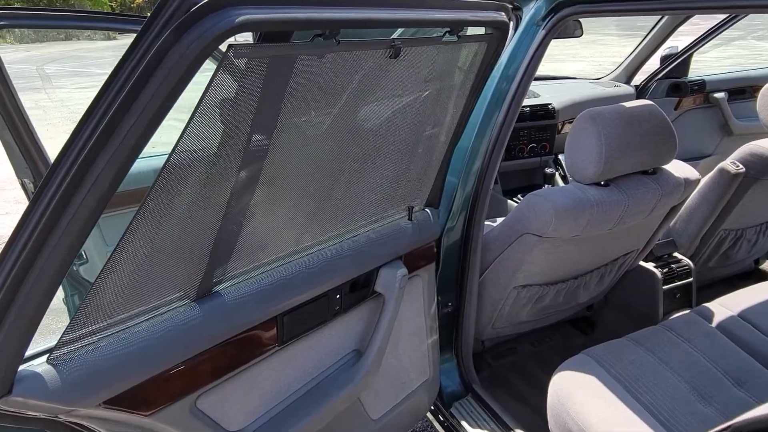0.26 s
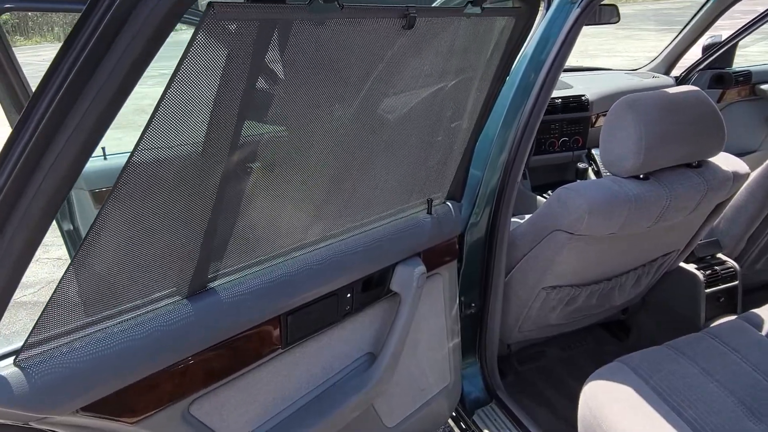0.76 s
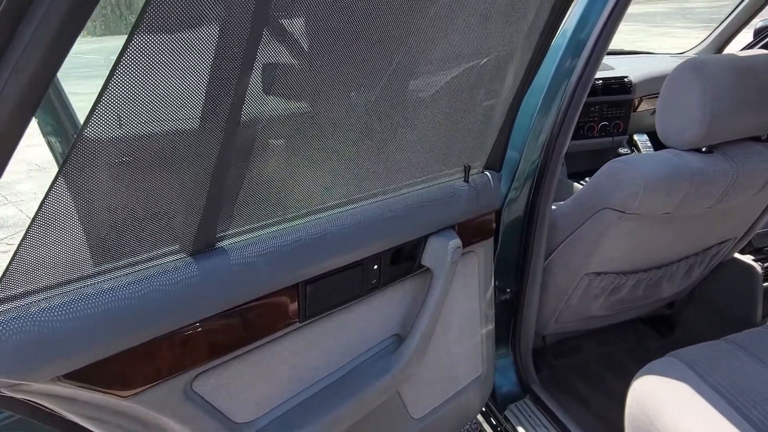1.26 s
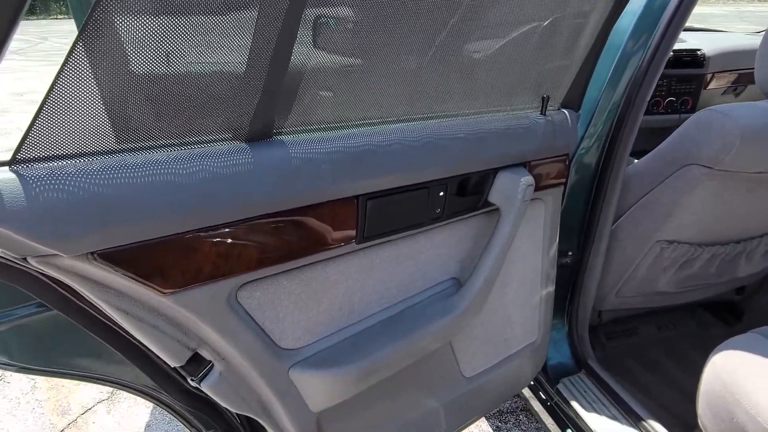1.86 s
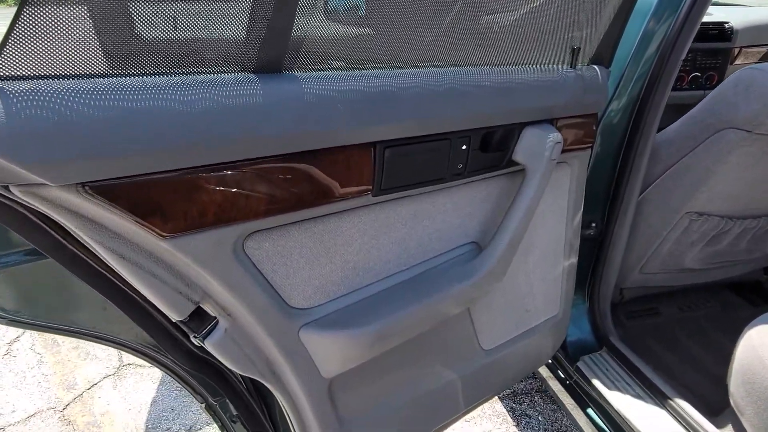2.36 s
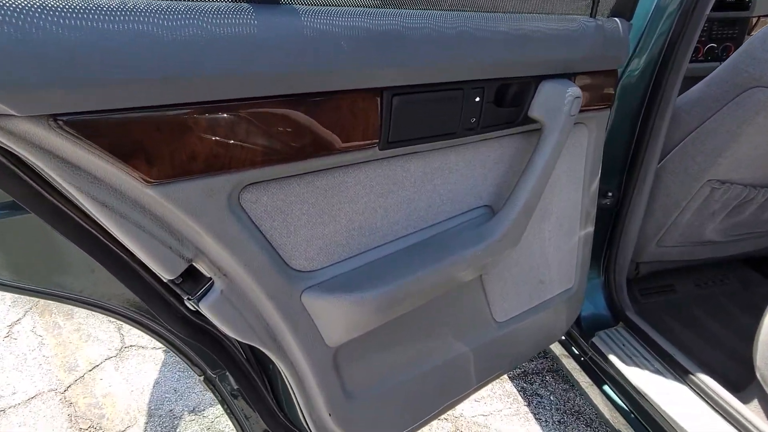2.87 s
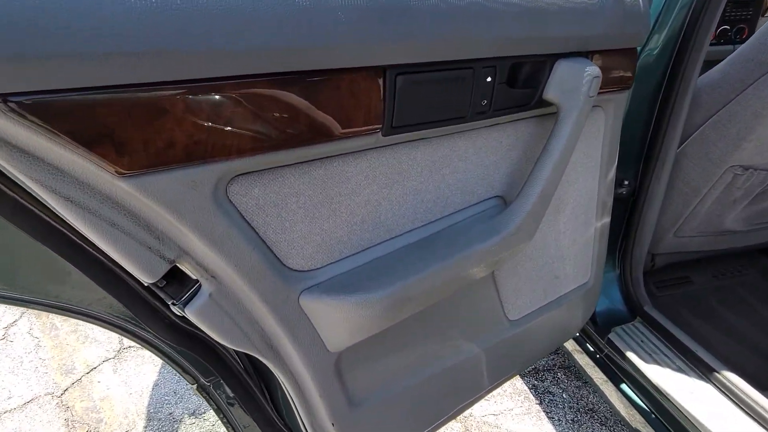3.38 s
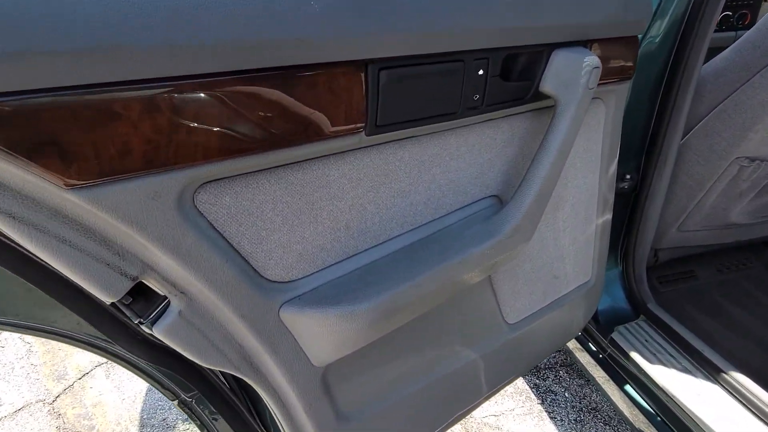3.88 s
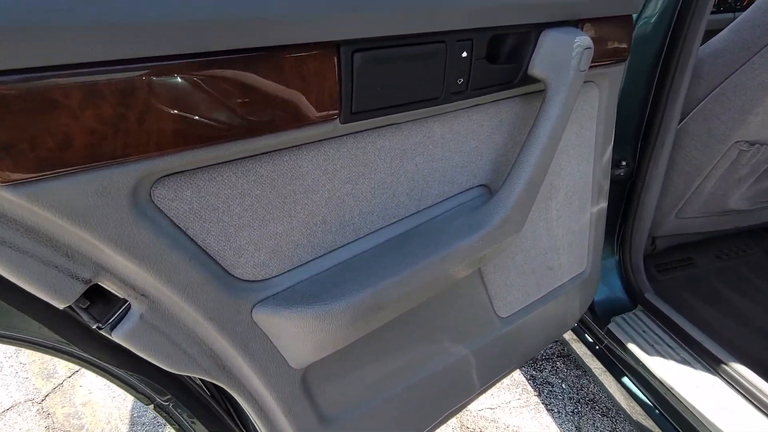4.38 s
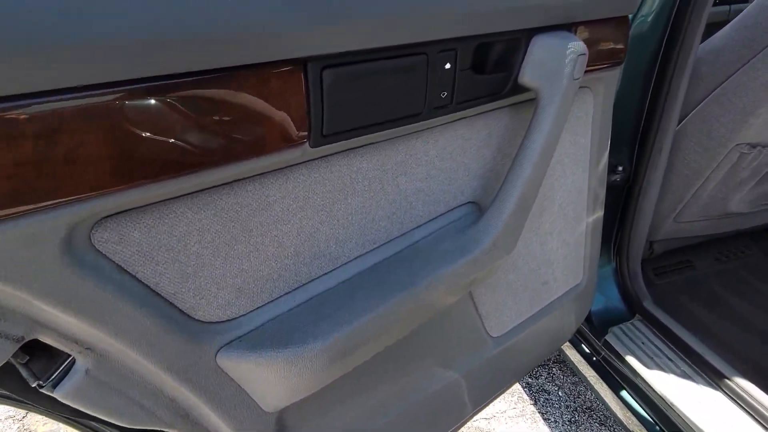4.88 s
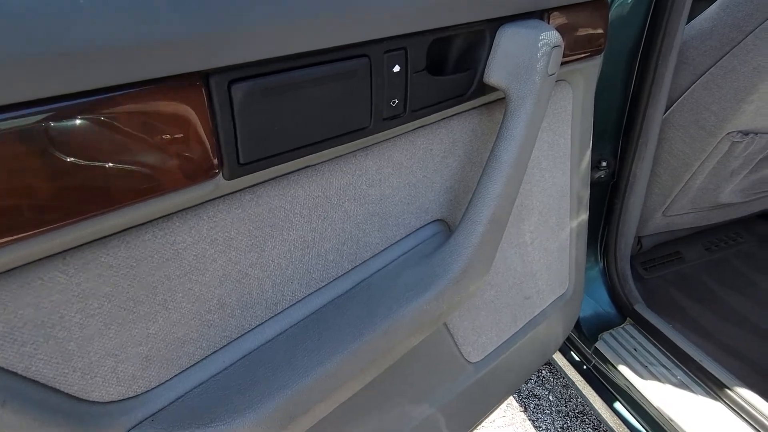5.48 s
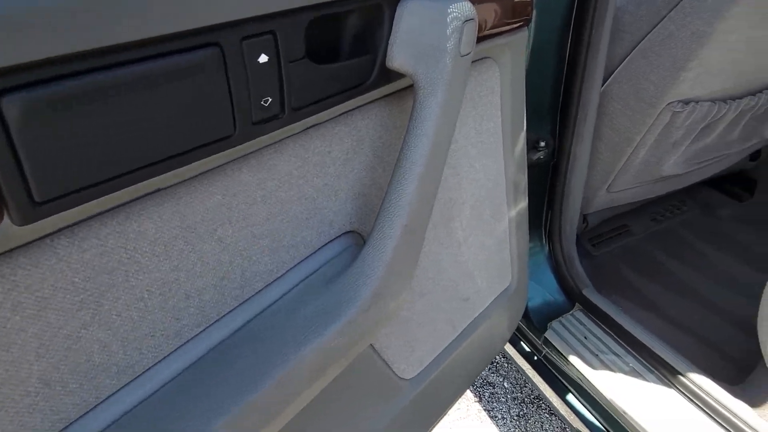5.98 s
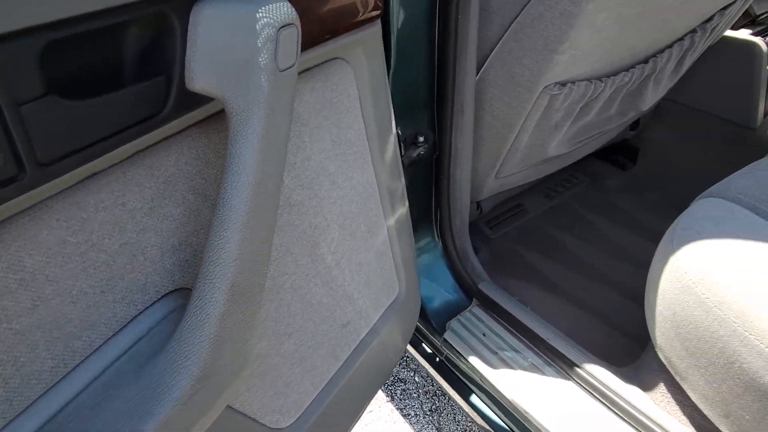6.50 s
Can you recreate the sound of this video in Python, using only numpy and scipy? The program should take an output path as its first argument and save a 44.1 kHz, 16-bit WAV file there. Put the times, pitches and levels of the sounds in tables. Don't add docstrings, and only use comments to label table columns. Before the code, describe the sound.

Outdoors beside a parked car with its rear door open, a soft wash of air, ground rumble and distant traffic carries a faint exhaust drone. The drone swells to a boomy peak before four seconds, then slowly sinks. A handheld stereo microphone adds small plastic ticks; a sole scuffs gritty concrete early on, and a far bird whistles upward.

```python
import sys
import numpy as np
from scipy import signal
from scipy.fft import rfft, irfft
from scipy.io import wavfile
from scipy.ndimage import uniform_filter1d

SR = 44100
rng = np.random.default_rng(int(sys.argv[2]) if len(sys.argv) > 2 else 0)


def gain_from_db(level_db):
    decades = np.asarray(level_db, float) / 20
    return 10 ** decades


def unload_audio(sound):
    columns = np.transpose(np.atleast_2d(sound))
    steps = np.round(np.clip(columns, -1, 1) * 32767)
    wavfile.write(sys.argv[1], SR, steps.astype(np.int16))


N = 297234


def evened(x):
    return x / np.sqrt(np.mean(abs(x) ** 2) + 1e-20)


def read(points, hz):
    f, value = np.transpose(points)
    return np.interp(np.log(hz + 1), np.log(f + 1), value)


def curves(rows):
    s, *columns = np.transpose(rows)
    return [np.interp(np.arange(N) / SR, s, c) for c in columns]


def bump(middle_s, half_s):
    return np.exp(-((np.arange(N) / SR - middle_s) / half_s) ** 2)


def ramp(start_s, length_s):
    progress = np.clip((np.arange(N) / SR - start_s) / length_s, 0, 1)
    return np.sin(np.pi / 2 * progress) ** 2


def stroke(start_s, length_s, rise_share, stop_s):
    rise = ramp(start_s - 0.01, rise_share * length_s + 0.0071)
    return rise * (1 - ramp(start_s + length_s, stop_s))


def joined(*levels_db):
    return 10 * np.log10(sum(gain_from_db(db) ** 2 for db in levels_db) + 1e-30)


def swells(rows):
    return 10 * np.log10(sum(gain_from_db(db) ** 2 * bump(s, half_s) for s, half_s, db in rows) + 1e-30)


def wander(rate_hz, count=24):
    t = np.arange(0, N + 64, 64) / SR
    drift = 0
    for f in np.geomspace(rate_hz / 20, rate_hz, count):
        drift = drift + np.sin(2 * np.pi * (f * t + rng.random())) / np.sqrt(f)
    return np.interp(np.arange(N) / SR, t, evened(drift))


# [f/Hz, likeness 0-1]
LIKENESS = [(60, 0.97), (150, 0.96), (290, 0.3), (600, 0.11), (1200, 0.88), (2500, 0.26), (5000, 0),
            (15000, 0.6)]
# [f/Hz, phase/radians]
LEFT_LEAD = [(100, 0), (260, -0.26), (500, -1.5), (860, -2.5), (1460, -4.5), (2240, -1.5), (3400, -2)]
# [f/Hz, level/dB]
LEFT_TILT = [(60, -0.5), (250, -3.2), (500, -3), (1000, -1.5), (2000, -4.5), (4000, -1.5), (12000, 3)]


def noise(layers, patchy_db, size):
    hop = size // 4
    frames = N // hop + 5
    hz = np.fft.rfftfreq(size, 1 / SR)
    a, b, c, d, patches = rng.standard_normal((frames, len(hz), 5), dtype=np.float32).T
    patches = uniform_filter1d(uniform_filter1d(patches, size=9, axis=0), size=9, axis=1)
    patches = evened(patches)

    same = np.clip(read(LIKENESS, hz), 0, 1)[:, None]
    delay = np.exp(-1j * read(LEFT_LEAD, hz))[:, None]
    left = a + 1j * b
    right = same * delay * left + np.sqrt(1 - same ** 2) * (c + 1j * d)
    tilt = gain_from_db(read(LEFT_TILT, hz) / 2)[:, None]
    z = np.array([left * tilt, right / tilt])
    z /= np.sqrt(np.mean(abs(z.mean(0)) ** 2, axis=1, keepdims=True))

    at = np.minimum(np.arange(frames) * hop, N - 1)
    power = 0
    for colour, level_db in layers:
        inside_band = (hz > colour[0][0]) * (hz < colour[-1][0])
        shape = gain_from_db(read(colour, hz)) ** 2 * inside_band
        power = power + np.outer(shape / shape.sum(), gain_from_db((level_db + np.zeros(N))[at]) ** 2)
    z *= np.sqrt(3 * power) * gain_from_db(patchy_db * patches)
    return signal.istft(z, nperseg=size, noverlap=size - hop)[1][:, :N]


# [t/s, camshaft speed f/Hz, boom level/dB]
DRONE = [(0.0, 23.2, -55), (0.5, 23.5, -49), (1.1, 23.6, -48.5), (1.6, 24.3, -43), (1.95, 24.75, -50.5),
         (2.2, 24.75, -43), (2.8, 24.78, -44), (3.0, 24.8, -37), (3.5, 24.82, -37.5), (3.74, 24.8, -29.5),
         (3.95, 24.82, -36.5), (4.1, 24.8, -35), (4.35, 24.9, -39), (4.52, 24.85, -37), (4.9, 24.75, -36),
         (5.4, 24.68, -38), (6.1, 24.5, -42), (6.74, 24.3, -52.5)]
# [level/dB at a boom of -40 dB, dB per dB of boom]
FOLLOW = [
    (-42.5, 0.8),
    (-60.5, .5),
    (-63.5, 0),
]
# [middle t/s, half length t/s, middle level/dB, high level/dB]
OPENINGS = [(3.202, 0.18, -49.5, -50.5), (3.606, 0.079, -62.5, -45), (3.759, 0.094, -46.5, -49.5),
            (4.094, 0.11, -59.5, -55), (4.517, 0.044, -58.5, -52.5), (4.891, 0.14, -46, -48.5),
            (5.245, 0.22, -49.5, -49), (5.604, 0.24, -53.5, -55.5), (6.2, 0.18, -52.5, -58)]


def order_levels():
    boom_db = curves(DRONE)[1]
    low_db, middle_db, high_db = (db + share * (boom_db + 40) for db, share in FOLLOW)
    middle_db = joined(middle_db, swells([(s, half_s, db) for s, half_s, db, _ in OPENINGS]))
    high_db = joined(high_db, swells([(s, half_s, db) for s, half_s, _, db in OPENINGS]))
    return low_db, boom_db, middle_db, high_db


GROUND = [(14, -31), (30, -26), (45, 3), (70, 6), (150, -2.5), (250, -6.5), (320, -6.5), (380, -51.5)]
RUMBLE = [(35, -42.5), (52, 0), (75, 29.5), (110, 20), (135, 7), (170, -49.5)]
BODY = [(280, -17.5), (340, -0.5), (420, -4.5), (480, -4), (540, -44.5)]
RING = [(440, -29), (510, 3), (580, -2.5), (700, -2), (790, -1), (880, -27.5)]
CAVITY = [(480, -27.5), (560, 3), (650, -1), (740, -7), (820, -24)]
ROAR = [(700, -4.5), (830, 4.5), (920, 1), (1050, -1), (1300, -5.5), (1700, -52.5)]
PUFF = [(70, -22), (95, 1.5), (122, 2.5), (140, -13.5), (190, -9), (230, -28)]
AIR = [(900, -31.5), (1250, -2.5), (1600, -4.5), (2150, -8), (2940, -12.5), (3600, -17), (4500, -25.5),
       (5500, -32), (7000, -49)]
LEAVES = [(3000, -26), (4500, -3.5), (6300, -4.5), (7500, -7), (9500, -4), (11000, -10.5), (15700, -13.5)]
SELF_NOISE = [(4000, -17.5), (6000, 1.5), (9500, -3), (11300, -9), (12300, -5.5), (15800, -4.5)]
# [steady level/dB, share of the upper orders that spills in/dB, change behind the door/dB]
BODY_RULE = (-54.5, -5.5, -4.5)
RING_RULE = (-53.5, -4, -0.56)
ROAR_RULE = (-55.5, -16.5, .5)
AIR_RULE = (-63, -25, 1.5)
# [middle t/s, level/dB]
LUMPS = [(.03, -50), (.45, -43), (.7, -39.5), (.92, -44), (1.26, -41.5), (1.7, -37.5), (2.0, -44),
         (2.3, -41), (2.6, -35), (3.13, -41), (3.34, -36.5), (3.64, -47.5), (4.0, -43), (4.6, -42.5),
         (5.42, -48), (5.87, -38), (6.17, -39), (6.53, -44.5)]
# [middle t/s, half length t/s, level/dB]
BREEZE = [(.1, .6, -84.5), (.8, .5, -80), (1.9, .7, -91.5), (2.9, .5, -95), (6.5, .4, -88.5)]


def wash():
    _, boom_db, _, upper_db = order_levels()
    behind_door = ramp(4.7, 0.5)
    shaded = ramp(5.1, 0.47)

    def ruled(rule, behind):
        steady_db, spill_db, change_db = rule
        return joined(steady_db, upper_db + spill_db) + change_db * behind

    lumps_db = swells([(s, 0.072, db) for s, db in LUMPS])
    traffic_db = -63 - 5.5 * np.arange(N) / SR
    low = [
        (GROUND, -43.5),
        (RUMBLE, joined(-48, lumps_db)),
        (BODY, ruled(BODY_RULE, shaded)),
        (RING, ruled(RING_RULE, behind_door)),
        (ROAR, ruled(ROAR_RULE, behind_door)),
        (PUFF, boom_db - 8.0),
        (CAVITY, -51.5 + 20 * np.log10(behind_door + 1e-3)),
    ]
    high = [
        (AIR, joined(ruled(AIR_RULE, behind_door), traffic_db)),
        (LEAVES, swells(BREEZE)),
        (SELF_NOISE, -85.5),
    ]
    return noise(low, patchy_db=1.1, size=2048) + noise(high, patchy_db=0.97, size=512)


# [order, level/dB against the leading order of its group, side share level/dB]
LOW_ORDERS = [(3, -14.5, -18), (4, -3, -24)]
BOOM_ORDERS = [(5, 0, -28), (6, -17, -17)]
MIDDLE_ORDERS = [(7, -3.5, -18.5), (9, 0, -18), (10, -12, -5.5)]
HIGH_ORDERS = [(11, 1, -11), (12, -13, 3), (13, -3, -1.5), (15, -15.5, -8), (16, -11.5, -1.5),
               (18, -10.5, -3)]


def engine():
    unsteady_db, slip_radians, waver_hz = 1.6, 0.05, 8.0
    hz = curves(DRONE)[0]
    turn = 2 * np.pi * np.cumsum(hz) / SR
    groups = (LOW_ORDERS, BOOM_ORDERS, MIDDLE_ORDERS, HIGH_ORDERS)
    out = np.zeros((2, N))
    for level_db, orders in zip(order_levels(), groups):
        for k, db, side_db in orders:
            phase = round(k) * (turn + slip_radians * wander(waver_hz)) + 2 * np.pi * rng.random()
            gain = np.sqrt(2) * gain_from_db(level_db + db + unsteady_db * wander(waver_hz))
            middle = np.sin(phase)
            side = gain_from_db(side_db) * np.cos(phase)
            out += gain * np.array([middle + side, middle - side])
    return out


# [t/s, peak level/dB, centre f/Hz, left-right level/dB, spread in log frequency]
KNOCKS = [(0.1874, -34.5, 2270, -6, 0.34), (1.3948, -30.5, 13500, 3, 0.37), (4.407, -51.5, 2680, 3, .2),
          (5.334, -53, 9260, -1, 0.36), (6.1723, -50, 9400, 3.5, 0.3), (6.4235, -43, 7800, 7, 0.12)]
# [t/s, peak level/dB, centre f/Hz, left-right level/dB]
TICKS = [(0.4184, -71, 8670, 3.5), (1.7125, -68, 7670, -1.0), (2.5162, -75, 7620, 2.5),
         (2.5336, -76, 8180, -20), (2.5955, -60, 8410, 1.0), (2.6464, -54, 10300, -2),
         (2.8265, -67, 9070, -1), (3.5249, -73, 8170, 2), (3.8477, -67, 7800, 7), (3.8984, -68, 9380, 1.0),
         (3.9504, -68, 8590, 6), (3.9994, -69, 7750, 3), (4.0814, -73, 9320, 2.0), (4.3031, -65, 9570, 4),
         (4.9484, -74, 9170, 3), (5.5792, -68, 7920, 4), (5.6026, -61, 9710, 5.0), (5.6236, -67, 9440, 0),
         (5.6994, -61, 9550, 2), (5.727, -67, 8020, 2.5), (6.0741, -64, 7870, 7), (6.0855, -64, 10500, 2.0),
         (6.1964, -68, 9140, -7), (6.3066, -64, 9460, 5), (6.5284, -68, 9080, 6)]


def ticks():
    length, lead_s, t60_s = 2048, 0.005, 0.03
    gain_db, tick_spread = 1.5, 0.22
    t = np.arange(length) / SR - lead_s
    hz = np.fft.rfftfreq(length, 1 / SR)
    envelope = gain_from_db(-60 * t / t60_s) * np.clip(t / 0.00035, 0, 1)
    small = [(s, db + gain_db, centre_hz, pan_db, tick_spread) for s, db, centre_hz, pan_db in TICKS]
    out = np.zeros((2, N))
    for s, db, centre_hz, pan_db, spread in KNOCKS + small:
        band = np.exp(-0.5 * (np.log((hz + 1) / centre_hz) / spread) ** 2)
        band += 0.13 * (hz > 2800) / (1 + (hz / centre_hz) ** 0.9)
        band *= centre_hz / (hz + centre_hz)
        contact = 9.4 * (9000 / centre_hz) * (abs(t - 0.0006) < 0.5 / SR)
        burst = rng.standard_normal((2, length)) + contact
        snap = irfft(rfft(burst * envelope) * band)
        snap /= np.linalg.norm(snap, axis=1, keepdims=True)
        pan = np.array([[pan_db], [-pan_db]]) / 2
        snap *= gain_from_db(db + pan) / abs(snap).max() * 1.4
        part = out[:, round((s - lead_s) * SR):][:, :length]
        part += snap[:, :part.shape[1]]
    return out


# [start t/s, length t/s, level/dB]
SCUFFS = [
    (0.992, 0.61, -66),
    (2.532, 0.036, -71.5),
    (2.592, 0.024, -64.5),
    (2.627, 0.093, -65.5),
]
# [f/Hz, level/dB per Hz]
GRIT = [(1500, -33), (2500, 6.5), (3300, 0), (4500, -8.5), (5600, -8), (6500, -4.5), (7700, -13),
        (9200, -6.5), (11300, -11.5), (13500, -14), (15800, -15)]


def scuffs():
    drag = 0
    for s, length_s, db in SCUFFS:
        sag_db = -1 * ramp(s + length_s / 2, length_s / 2)
        drag = drag + stroke(s, length_s, 0.35, 0.31 * length_s + 0.008) * gain_from_db(db + sag_db)
    grains = evened(uniform_filter1d(rng.standard_normal(N), size=150))
    return drag * gain_from_db(0.4 * grains) * noise([(GRIT, 0.9)], patchy_db=0.5, size=256)


# [start t/s, length t/s, first f/Hz, last f/Hz, level/dB]
NOTES = [
    (1.082, .09, 2760, 3080, -65),
    (1.803, 0.39, 2260, 2880, -71),
    (1.94, .09, 1075, 1340, -61),
    (2.65, 0.2, 2193, 2840, -66),
    (6.693, 0.046, 4100, 4130, -79),
]
SIDEWAYS = [-0.54, -0.37, -.3, 0.61, 0.5]


def bird():
    climb_hz_per_s, steps_per_s, stepping = 4500, 27, 0.6
    echo_db, flutter_db, echo_t60_s = -9.0, 5.0, 0.17
    flutter = uniform_filter1d(uniform_filter1d(rng.standard_normal(N), size=400), size=250)
    flutter = evened(flutter)
    song = np.zeros((2, N))
    for (s, length_s, first_hz, last_hz, db), left in zip(NOTES, SIDEWAYS):
        t = np.arange(N) / SR - s
        step_rate = 2 * np.pi * steps_per_s
        t = t + stepping * np.sin(step_rate * t) / step_rate
        hz = np.clip(first_hz + climb_hz_per_s * t, first_hz, max(first_hz, last_hz))
        whistle = np.sin(2 * np.pi * np.cumsum(hz * (1 + 0.0033 * flutter)) / SR)
        note = stroke(s, length_s, 0.13, 0.012) * gain_from_db(db + flutter_db * flutter) * whistle
        song += np.outer([left, 1], 1.65 * note)
    taps = rng.standard_normal((2, 6000)) * gain_from_db(-60 * np.arange(6000) / SR / echo_t60_s)
    echo = signal.fftconvolve(song[1:], taps / np.linalg.norm(taps[0]), axes=1)[:, :N]
    return song + gain_from_db(echo_db) * echo


def scene():
    return wash() + engine() + ticks() + scuffs() + bird()


def roll_off(x):
    return signal.sosfilt(signal.butter(12, 16460, fs=SR, output="sos"), x)


def record(dry):
    opening = np.sin(np.pi / 2 * np.minimum(np.arange(N) / 400, 1)) ** 2
    top_cut = signal.firwin(511, 15720, window=("kaiser", 9), fs=SR)
    mix = signal.oaconvolve(dry * opening, top_cut[None], "same")
    return roll_off(mix)


dry = scene()
out = record(dry)
unload_audio(out)
```